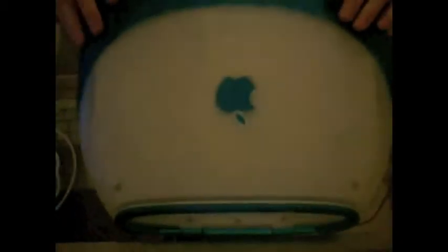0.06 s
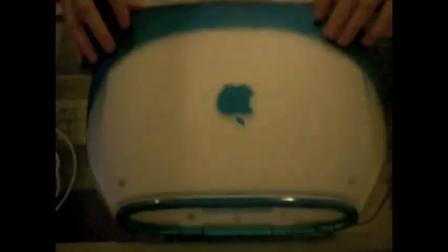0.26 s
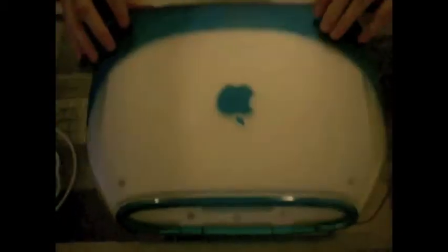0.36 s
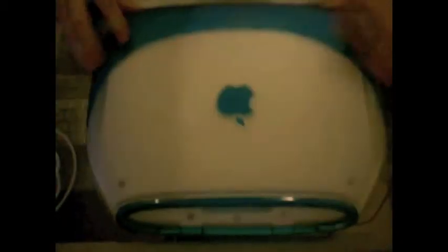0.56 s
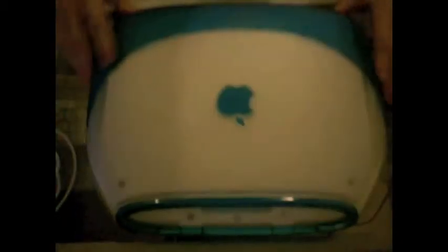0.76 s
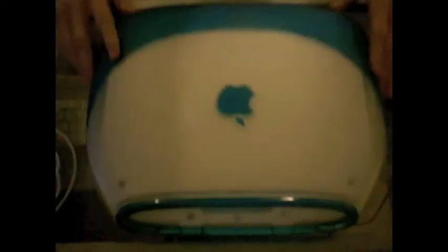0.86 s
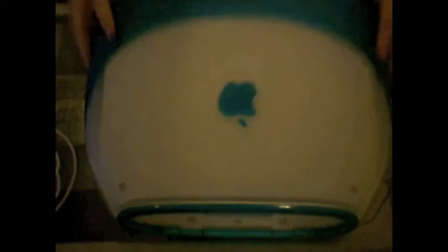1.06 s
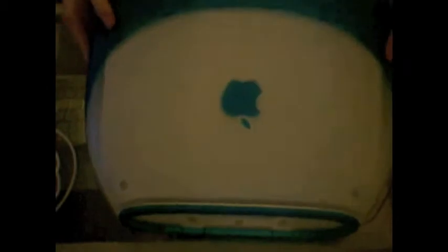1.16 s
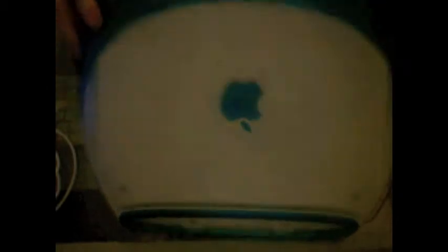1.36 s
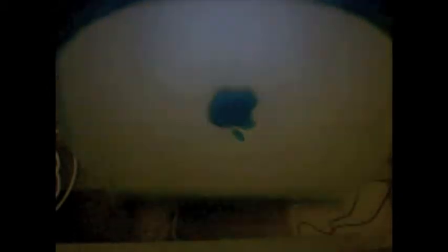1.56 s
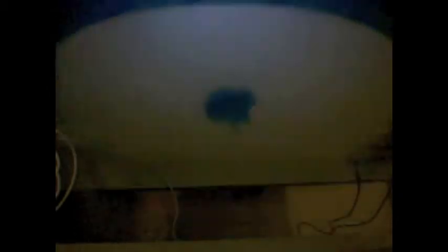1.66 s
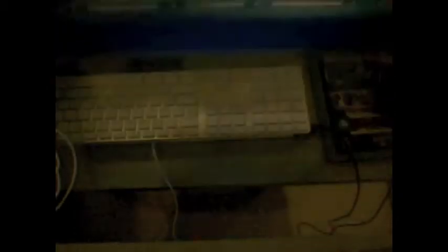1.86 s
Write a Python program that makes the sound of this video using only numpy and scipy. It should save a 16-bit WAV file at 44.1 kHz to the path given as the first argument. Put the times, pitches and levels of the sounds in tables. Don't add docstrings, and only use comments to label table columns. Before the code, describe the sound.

A hollow plastic laptop is handled on a wooden table, heard close in a small humming room. Faint taps begin at 0.1 s; a hard clack and table boom come at 0.25 s. Soft pushes and rubbing follow. Rubber trim judders from 0.74 s, a seam snaps at 0.84 s, duller bumps near 0.95 s. Stronger knocks at 1.2 s, then raps and ticks thin out by 1.9 s.

```python
import sys
import numpy as np
from scipy import signal
from scipy.fft import rfft, irfft
from scipy.io import wavfile
from scipy.ndimage import uniform_filter1d

SR = 44100
rng = np.random.default_rng(int(sys.argv[2]) if len(sys.argv) > 2 else 0)


def linear_from_db(decibels):
    return 10 ** (np.asarray(decibels, float) / 20)


def unload_audio(sound):
    columns = np.transpose(np.atleast_2d(sound))
    steps = np.round(np.clip(columns, -1, 1) * 32767)
    wavfile.write(sys.argv[1], SR, steps.astype(np.int16))


N = 83790


def colour(x, points):
    f = np.maximum(np.fft.rfftfreq(2048, 1 / SR), 1)
    p = np.array(points, float)
    log_gain = np.interp(np.log(f), np.log(p[:, 0]), p[:, 1]) * np.log(10) / 20
    cepstrum = irfft(log_gain)
    cepstrum[1:1024] *= 2
    cepstrum[1025:] = 0
    return signal.fftconvolve(x, irfft(np.exp(rfft(cepstrum))))[:len(x)]


def unit(x):
    return x / np.sqrt(np.mean(x ** 2))


def mode(x, hz, t60):
    pole = np.exp(2j * np.pi * hz / SR - np.log(1000) / (t60 * SR))
    return signal.lfilter([1, -1], [1, -pole], x).real * SR / (2 * np.pi * hz)


def push(ms):
    w = np.hanning(int(ms * SR / 1000) + 3)
    return w / w.sum()


def rise(t, ms):
    return np.sin(np.pi / 2 * np.clip(t * 1000 / max(ms, .1), 0, 1)) ** 2


def add(out, s, x):
    i = int(s * SR)
    out[i:i + len(x)] += x[:N - i]


def walk(rate):
    k = int(SR / rate)
    return unit(uniform_filter1d(uniform_filter1d(rng.standard_normal(N), k), k))


def swells(rows):
    t = np.arange(N) / SR
    return sum(linear_from_db(db) * np.exp(-((t - s) / half) ** 2) for s, db, half in rows)


def slips(per_s):
    return (rng.random(N) < per_s / SR) * rng.standard_normal(N)


# (frequency [Hz], level [dB], t60 [s])
SHELL_MODES = [(415, -10.5, 0.3), (520.5, -1, 0.044), (706.5, -9.5, 0.036), (840, 4, 0.019),
               (928, -19.5, 0.03), (1150, -13, 0.028), (1300, -30, 0.027), (1544, -10.5, 0.073),
               (1670, -41, 0.035), (1937, -13, 0.038)]


def ring_shell(force, stretch=1):
    return sum(linear_from_db(db) * mode(force, hz, stretch * t60) for hz, db, t60 in SHELL_MODES)


# (time [s], level [dB], ring [Hz], build-up [ms])
SHELL_KNOCKS = [(0.102, -29.5, 415, 2.1), (0.172, -34, 510, 6.7), (0.201, -40, 506, 3.0),
                (0.214, -26, 550, 2.7), (0.2471, -6, 594, 0.68), (0.384, -31, 415, 5.6),
                (0.485, -27.5, 532, 2.9), (0.629, -37, 523, 3.6), (0.659, -40, 444, 1.5),
                (0.686, -29, 450, 2.9), (0.729, -32, 490, 4.7), (0.93, -25, 514, 3.4),
                (0.942, -28, 425, 2.2), (0.955, -32, 341, 8.3), (0.9594, -17, 450, 3.26),
                (1.046, -32.5, 532, 3.9), (1.13, -27, 519, 2.2), (1.208, -17, 334, 1.34),
                (1.243, -21.5, 376, 1.9), (1.493, -27, 413, 4.3), (1.511, -20.5, 390, 2.65),
                (1.519, -32, 417, 3.7)]
# (time [s], level [dB], ring [Hz], build-up [ms])
RIM_RAPS = [(0.195, -30, 1053, 1.4), (0.2462, -12.5, 1150, 1.1), (0.2464, -16.5, 2255, 0.41),
            (0.2496, -17.5, 1559, 1.8), (0.3114, -19, 966, 0.9), (0.487, -36.5, 1010, 1.25),
            (0.685, -29, 1220, 0.8), (0.84, -26.5, 1300, 1.8), (1.2035, -28, 674, 2.0),
            (1.2098, -29, 1940, 0.67), (1.216, -24.5, 970, 3.1), (1.2342, -21, 990, 2.3),
            (1.236, -32, 1730, 1.2), (1.256, -36, 1766, 0.85), (1.258, -25.5, 1100, 0.74),
            (1.313, -20, 835, 1.2), (1.383, -28.5, 1820, 0.5), (1.386, -25.5, 900, 1.1),
            (1.496, -33, 1025, 1.5), (1.511, -31, 990, 1.6), (1.544, -29.5, 930, 1.9),
            (1.555, -22.5, 1100, 0.8), (1.661, -39.5, 988, 1.5), (1.755, -37.5, 940, 1.2),
            (1.846, -30, 403, 3.3), (1.848, -31.5, 920, 0.52), (1.866, -29.5, 1020, 0.24)]
# (time [s], level [dB], ring [Hz], build-up [ms])
TRIM_JUDDER = [(0.744, -20, 496, 4.5), (0.7665, -18, 466, 4.4), (0.783, -21.5, 476, 3.1),
               (0.7895, -22, 500, 2.3), (0.7978, -27, 454, 3.8), (0.8075, -25.5, 487, 3),
               (0.8192, -25, 460, 2.5), (0.832, -28.5, 914, 2), (0.853, -27.5, 500, 2.4),
               (0.86, -29.5, 563, 1.6), (0.781, -27.5, 1150, 2.6), (0.797, -28.5, 1150, 2.0),
               (0.81, -25.5, 1020, 2.0), (0.767, -28, 1390, 2.0), (0.851, -35, 1330, 1.6)]


def knocks():
    ring_t60_s, rattle_t60_s, rattle_db, shell_db = 0.02, 0.041, -4.5, -4.5
    out, t = np.zeros(N), np.arange(4000) / SR
    for s, db, ring_hz, ms in SHELL_KNOCKS + RIM_RAPS + TRIM_JUDDER:
        late = np.maximum(t - ms / 1000, 0)
        swell = rise(t, ms)
        ring_decay = linear_from_db(-60 * late / (ring_t60_s + 2.5 * ms / 1000))
        ring = -swell * ring_decay * np.sin(2 * np.pi * ring_hz * t)
        rattle_decay = linear_from_db(-60 * late / 0.032) + linear_from_db(rattle_db - 60 * late / rattle_t60_s)
        grit = rng.standard_normal(len(t)) * swell * rattle_decay
        grit = np.convolve(grit, push(0.35 + 0.12 * ms))[:len(t)]
        body = ring_shell(grit)
        add(out, s, linear_from_db(db - 1) * (ring + linear_from_db(shell_db) * body / abs(body).max()))
    return out


# (frequency [Hz], level [dB], t60 [s])
TABLE_MODES = [(39.6, -19, 0.1), (71, -9, 0.14), (132.8, -3, 0.12), (178, -11.5, .12), (216.5, -8, 0.13),
               (277.2, -5, 0.14), (387, -7, 0.061)]


def ring_table(force):
    return sum(linear_from_db(db) * mode(force, hz, t60) for hz, db, t60 in TABLE_MODES)


# (time [s], level [dB], contact [ms])
TABLE_BLOWS = [(.247, -13.5, 2.3), (0.256, -9, 3.14), (0.2782, -19, 4), (0.286, -36, 2.8),
               (0.454, -29, 2.4), (0.463, -24.5, 2.97), (0.575, -24, 5.25), (0.943, -20.5, 4.1),
               (0.997, -17.5, 7.1), (1.038, -29.5, 4.5), (1.202, -23.5, 2.26), (1.208, -25.5, 3.7),
               (1.228, -20.5, 2.8), (1.271, -21.5, 4.35), (1.421, -23.5, 2.57), (1.4361, -28.5, 3.5)]


def thumps():
    force = np.zeros(N)
    for s, db, ms in TABLE_BLOWS:
        add(force, s, -linear_from_db(db - 4.5) * push(ms))
    return ring_table(force)


# (time [s], level [dB], ring [Hz], t60 [s])
TABLE_BOOMS = [
    (0.2478, -19.5, 133.6, 0.12),
    (0.456, -32, 177.4, 0.26),
    (0.585, -30, 122.7, 0.14),
    (0.948, -36, 116.2, 0.43),
    (1.035, -39, 135, 0.27),
    (1.1995, -16, 123.6, .15),
    (1.273, -25.5, 133.6, 0.19),
    (1.4328, -32, 128.5, .25),
]


def booms():
    out, t = np.zeros(N), np.arange(SR // 2) / SR
    for s, db, hz, t60 in TABLE_BOOMS:
        decay = linear_from_db(db - 60 * t / t60)
        add(out, s, -rise(t, 3.6) * decay * np.sin(2 * np.pi * hz * t))
    return out


# (time [s], level [dB], colour [Hz], build-up [ms])
SEAM_TICKS = [(0.1006, -38, 1760, 1.9), (0.2461, -13, 6700, 0.73), (0.3416, -37.5, 6340, 1.1),
              (0.537, -44, 2090, 1.4), (0.626, -47, 3500, 0.72), (0.66, -49, 1900, 1.1),
              (0.6848, -42.5, 3960, 0.59), (0.7169, -39, 2260, 0.32), (0.7444, -28.5, 2350, 2.5),
              (0.84, -21.5, 4500, 0.75), (0.9362, -35.5, 3100, 0.84), (0.9592, -32, 3470, 1.74),
              (1.127, -32, 6600, 0.28), (1.3113, -21, 3100, 0.52), (1.383, -29.5, 6440, 0.63),
              (1.4063, -31, 2630, 1.1), (1.496, -35.5, 4630, 0.8), (1.499, -30, 3450, 2.8),
              (1.58, -31.5, 2120, 1.4), (1.7538, -41, 3200, 0.55), (1.8017, -35, 4730, 0.27),
              (1.848, -36.5, 2130, 0.57), (1.886, -34.5, 2550, 0.49)]
# (frequency [Hz], density [dB per Hz])
CRACK_COLOUR = [(880, -24.5), (1500, 1), (3840, -8.5), (5660, -5), (7030, -8), (8320, -13), (13900, -28.5),
                (16000, -57)]


def ticks():
    crack_t60_s, tail_t60_s, tail_db, tint_db = 0.01, 0.16, -11, 6.5
    out, t = np.zeros(N), np.arange(6000) / SR
    for s, db, hz, ms in SEAM_TICKS:
        late = np.maximum(t - ms / 1000, 0)
        crack = linear_from_db(-60 * late / (crack_t60_s + 3.4 * ms / 1000))
        tail = linear_from_db(tail_db - 60 * late / tail_t60_s)
        burst = colour(rng.standard_normal(len(t)), CRACK_COLOUR) * rise(t, ms) * (crack + tail)
        burst = colour(burst, [(hz / 1.67, 0), (hz, tint_db), (hz * 1.29, 0)])
        add(out, s, linear_from_db(db + 2.5) * burst / abs(burst).max())
    return out


# (centre time [s], level [dB], half length [s])
SHELL_DRAGS = [(.205, -33.5, 0.0082), (.322, -39.5, 0.017), (.742, -38.5, 0.004), (.80, -42, 0.074),
               (.85, -44.5, 0.0061), (.952, -34.5, 0.014), (1.222, -37, 0.014), (1.25, -39, 0.036),
               (1.40, -39, 0.01), (1.47, -60, 0.034), (1.52, -40.5, 0.032), (1.598, -45.5, 0.01)]


def scrapes():
    grains = slips(2500) * linear_from_db(3.7 * walk(130))
    grains = np.convolve(grains, push(0.55), "same")
    shell = unit(ring_shell(grains, 0.39))
    softer = np.convolve(grains, push(0.88), "same")
    table = unit(sum(mode(softer, hz, 0.019) for hz, _, _ in TABLE_MODES[4:]))
    return swells(SHELL_DRAGS) * (shell + linear_from_db(-2.5) * table)


# (time [s], level [dB])
HAND_PRESSURE = [
    (0.0, -61),
    (0.38, -57),
    (0.492, -48),
    (1.48, -49.5),
    (1.9, -51),
]
# (centre
# time [s], level [dB], half length [s])
HAND_STROKES = [(0.214, -52.5, 0.039), (0.245, -42, 0.0022), (0.262, -40, 0.015), (0.294, -50.5, 0.047),
                (0.401, -51.5, 0.042), (0.56, -58.5, 0.032), (0.792, -43.5, 0.024), (0.855, -53, 0.049),
                (0.967, -53.5, 0.04), (1.218, -42.5, 0.012), (1.251, -55.5, 0.046), (1.406, -52.5, 0.096),
                (1.525, -46.5, 0.045), (1.608, -51, 0.034), (1.697, -51.5, 0.052), (1.89, -52.5, 0.058)]
# (frequency [Hz], density [dB per Hz])
SKIN_COLOUR = [(880, -88), (1500, -2.5), (2560, -15), (3480, -10.5), (7540, -11), (14600, -42),
               (15500, -20), (16000, -111)]


def rubbing():
    grains = slips(900) * linear_from_db(0.8 * rng.exponential(size=N))
    grains = np.convolve(grains, push(0.47), "same") * linear_from_db(4 * walk(17.4))
    shell = unit(ring_shell(grains, 1.93))
    table = unit(ring_table(np.convolve(grains, push(1.7), "same")))
    time_s, pressure_db = np.array(HAND_PRESSURE).T
    pressure = linear_from_db(np.interp(np.arange(N) / SR, time_s, pressure_db) - 4)
    skin = unit(colour(rng.standard_normal(N), [(700, -0.33)] + SKIN_COLOUR))
    skin = skin * linear_from_db(2.0 * walk(80))
    return pressure * (shell + linear_from_db(1.5) * table) + linear_from_db(3.5) * swells(HAND_STROKES) * skin


def room(x):
    t60_s, top_t60_s, low_hz = 0.52, 0.29, 233
    t = np.arange(SR // 2) / SR
    n = rng.standard_normal(len(t))
    low = signal.lfilter([.15], [1, -.85], n)
    echo = low * linear_from_db(-60 * t / t60_s) + .5 * (n - low) * linear_from_db(-60 * t / top_t60_s)
    echo = echo * np.clip(t / .008, 0, 1)
    sent = colour(x, [(low_hz / 2, -12), (low_hz, 0)])
    return linear_from_db(-14.5) * signal.fftconvolve(sent, echo / np.sqrt(np.sum(echo ** 2)))[:N]


# (frequency [Hz], density [dB per Hz])
AIR_COLOUR = [(12, -129), (20, -9.5), (120, 4), (337, -5), (410, -5), (2990, -27), (6720, -25.5),
              (13900, -42.5), (16000, -41)]
AIR_DB = -42.5


def air():
    hum_hz, hum_width_hz, hum_db, line_db = 121.7, 26, -54, -51.5
    noise = uniform_filter1d(uniform_filter1d(rng.standard_normal(N), size=150), size=110)
    hum = unit(mode(noise, hum_hz, 1.0 / hum_width_hz))
    phase = 2 * np.pi * np.cumsum(hum_hz + 1.27 * walk(3.7)) / SR
    line = linear_from_db(line_db + 1.6 * walk(7.7)) * np.sqrt(2) * np.sin(phase)
    return linear_from_db(AIR_DB - 4.5) * unit(colour(rng.standard_normal(N), AIR_COLOUR)) + linear_from_db(hum_db) * hum + line


# (frequency [Hz], side minus mid [dB])
PORT_COLOUR = [(60, -51), (110, -43.5), (200, -42), (380, -39.5), (700, -36), (1290, -29), (2380, -19.5),
               (4400, -11), (8120, -3.5), (15000, 3.5)]


def port_difference(wet):
    hiss = unit(colour(rng.standard_normal(N), AIR_COLOUR))
    hiss = linear_from_db(AIR_DB + 6) * colour(hiss, PORT_COLOUR)
    drifting = linear_from_db(-1) * colour(wet, PORT_COLOUR) * walk(300)
    return colour(drifting + hiss, [(100, 3.0), (1000, -1.5), (3000, -8.5), (9000, -11.5)])


def scene():
    near = knocks() + thumps() + booms() + ticks() + scrapes() + rubbing()
    wet = near + room(near)
    side = port_difference(wet)
    return wet + air() + np.array([side, -side])


def roll_off(x):
    return signal.sosfilt(signal.butter(12, 16470, fs=SR, output="sos"), x)


def record(dry):
    top_cut = signal.ellip(8, .3, 60, 16000, fs=SR, output="sos")
    mix = signal.sosfilt(top_cut, dry)
    return roll_off(mix)


dry = scene()
out = record(dry)
unload_audio(out)
```